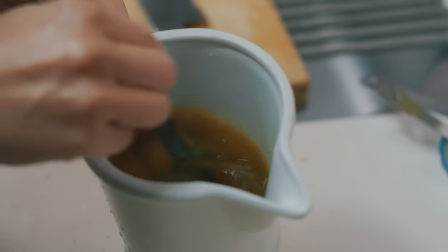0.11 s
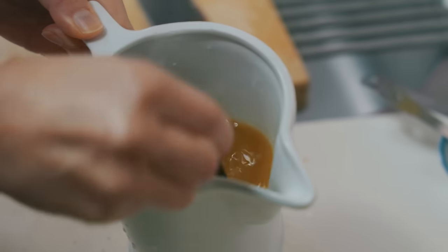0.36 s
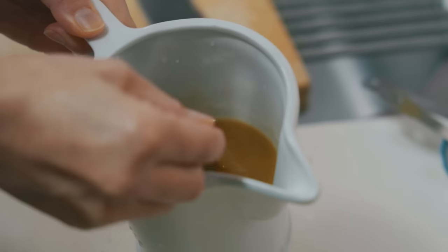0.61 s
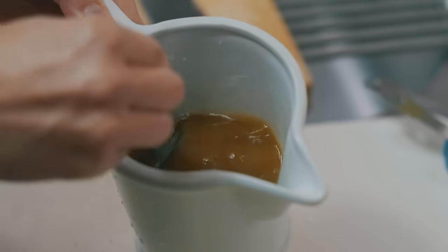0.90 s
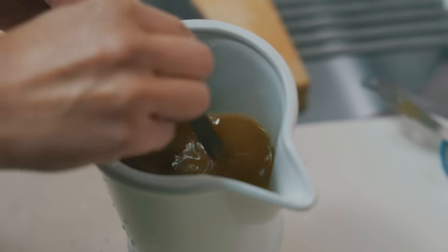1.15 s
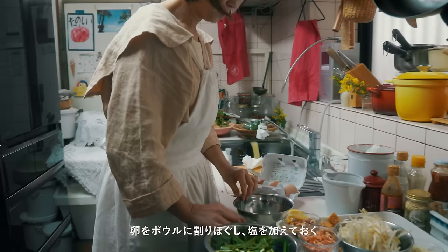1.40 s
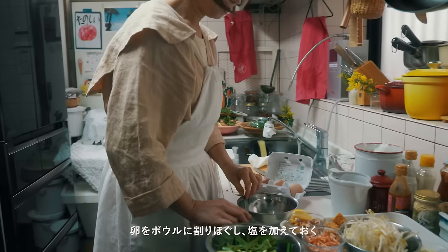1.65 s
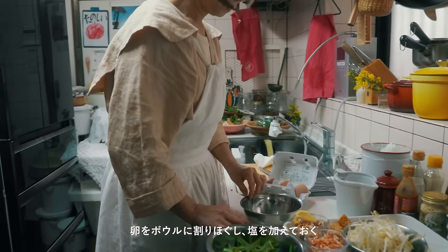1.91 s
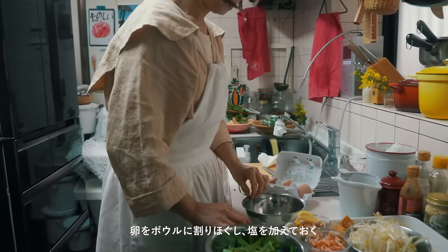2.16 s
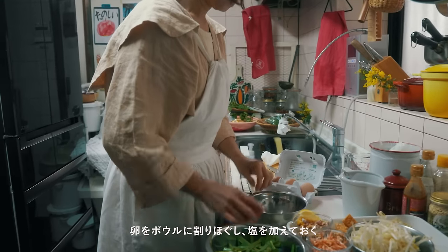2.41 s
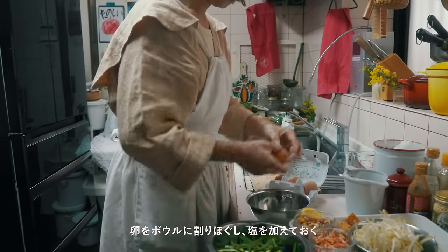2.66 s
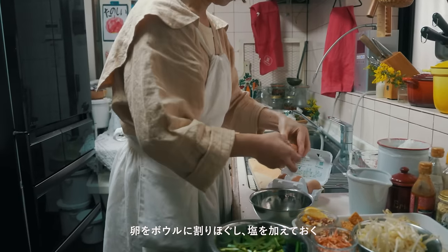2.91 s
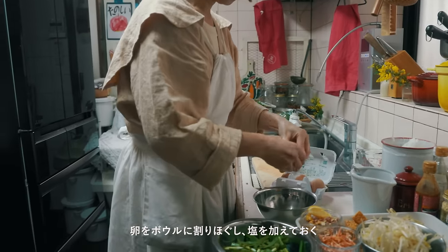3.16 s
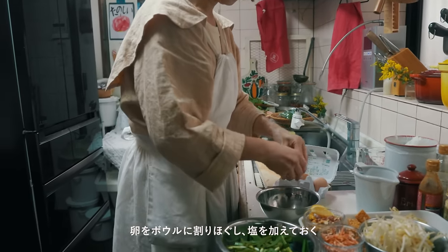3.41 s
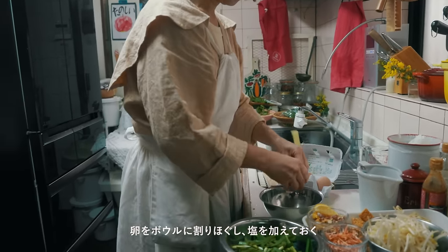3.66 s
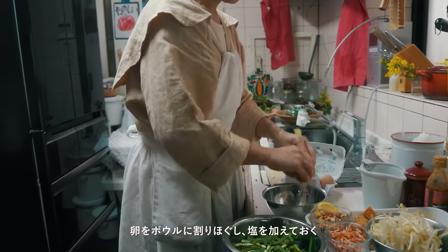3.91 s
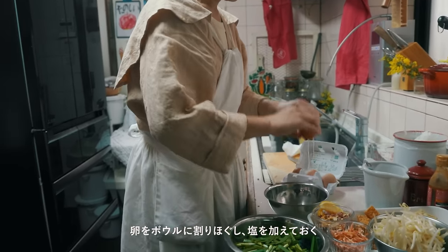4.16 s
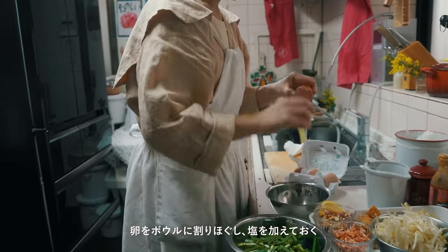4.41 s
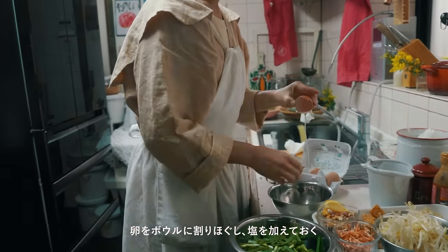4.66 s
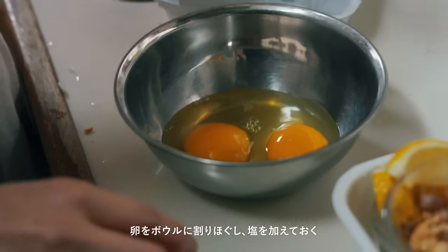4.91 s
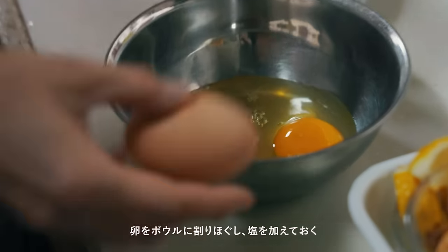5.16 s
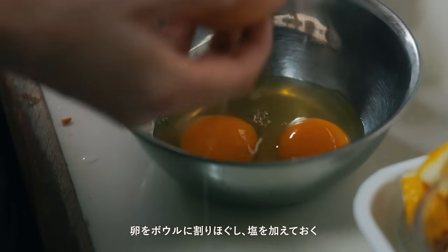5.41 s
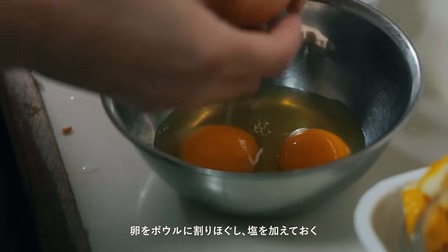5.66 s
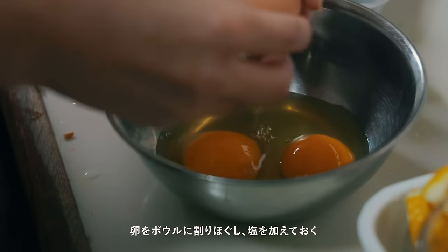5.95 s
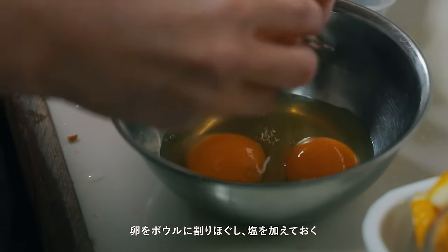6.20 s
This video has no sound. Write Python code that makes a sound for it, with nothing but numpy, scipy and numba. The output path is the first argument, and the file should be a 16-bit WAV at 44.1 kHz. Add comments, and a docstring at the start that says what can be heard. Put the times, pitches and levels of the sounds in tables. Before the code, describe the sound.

Hollow stirring and bright spoon clinks stop abruptly; hard eggshell knocks follow, then delicate crackling and a crisp close shell break.

```python
"""A spoon stirs thick sauce in a jug: stick-slip noise drives a gliding air resonance, and clinks ring wall
modes. At a hard cut this stops dead; eggs are then rapped on a kitchen counter beside a steel bowl and prised
open. Blows are short fracture noise plus damped counter modes; cracks are pitched snaps that sound the hollow
shell, among brief swells of grainy noise. Decaying noise gives the small hard kitchen's reverberation; the last
cracks get less. Shaped noise is the room tone, with a faint mains hum and, late on, a thin whine."""
import sys
import numpy as np
from scipy import signal
from scipy.fft import rfft, irfft
from scipy.io import wavfile
from numba import njit

SR = 44100
rng = np.random.default_rng(int(sys.argv[2]) if len(sys.argv) > 2 else 0)


def invert_db(x):
    """Field ratio 10**(x/20) for x, a level in decibels (scalar or array-like)."""
    u = np.asarray(x, float) / 20
    return 10 ** u


def wav_record(signal):
    """Record a signal, one row per channel, as 16-bit PCM in the file named by sys.argv[1]."""
    frames = np.transpose(np.atleast_2d(signal))
    bounded = np.clip(frames, -1, 1)
    # unit amplitude maps onto the largest positive 16-bit level
    quanta = np.round(bounded * 32767).astype(np.int16)
    wavfile.write(sys.argv[1], SR, quanta)


N = 278271
TIME, HZ = np.arange(N) / SR, np.maximum(np.fft.rfftfreq(N, 1 / SR), 1)
CUT_S, NEAR_FROM_S = 1.336, 5.5     # the stirring stops; the shell is heard close from here

# Blows on the counter. Each row: start in seconds, then relative levels in dB of crunch, knock and thud.
BLOWS = [(1.3381, -50, -38, -34), (1.4478, -22, -10.5, -18.5), (1.6311, -2.5, -10.5, -27.5),
         (1.8239, -12.5, -26.5, -31.5), (2.0145, -11.5, -27, -31.5), (2.2045, -21.5, -31, -31),
         (2.362, -26, -35, -39.5), (2.6784, -56.5, -55.5, -45.5), (2.7818, -63, -76, -52),
         (3.6498, -34, -46.5, -67), (4.7577, -54.5, -56.5, -49), (4.8038, -9.5, -32.5, -38.5),
         (5.0028, -15, -33.5, -33.5), (5.3778, -61, -75.5, -51)]
# Spectrum of the crushing shell. Each row: frequency in Hz, density in dB per Hz.
CRUNCH_SPECTRUM = [(1060, -19.5), (1800, -7.5), (3200, -16), (3670, -13.5), (6180, -11), (8750, -9),
                   (14700, -5.5), (16000, -35.5)]
# Upper modes of the counter top. Each row: frequency in Hz, relative level in dB, decay time t60 in seconds.
UPPER_COUNTER_MODES = [(462.8, 2, 0.074), (550, -5, 0.07), (610, -1.5, 0.052), (715, 0, 0.03),
                       (840, -1.5, 0.029), (945, 0.5, 0.033), (1200, 11, 0.0068), (1387, -6.5, 0.063),
                       (1610, -10.5, 0.027)]
# Low modes of the counter top. Each row: frequency in Hz, relative level in dB, decay time t60 in seconds.
LOW_COUNTER_MODES = [(140, -14, 0.24), (175.5, -4.5, 0.053), (212, -1, 0.39), (243, 1, .11),
                     (307, -6.5, 0.038), (380, -2, 0.049), (440, -7.5, .06)]
# Shell cracking open. Each row: start in seconds, relative level in dB, pitch in Hz,
# relative level of the hollow in dB, note of the hollow in Hz.
SHELL_CRACKS = [(3.157, -41.5, 2566, -49.5, 2930), (3.29, -38.5, 2510, -45, 2760),
                (3.384, -43, 5180, -45.5, 2150), (3.397, -42.5, 3650, -52, 2480),
                (3.448, -33.5, 6940, -49, 2280), (3.478, -49, 7800, -48, 1390),
                (3.573, -48, 4620, -51, 2480), (3.648, -34, 7200, -36, 2785),
                (3.658, -37.5, 10400, -41, 2560), (3.678, -35.5, 9330, -58, 2490),
                (3.728, -45.5, 10050, -63, 1080), (3.756, -60, 2530, -51, 2050),
                (3.774, -47, 5450, -51, 1870), (3.818, -60, 2510, -43.5, 1410),
                (3.88, -53.5, 2570, -48, 1890), (3.971, -48, 2870, -39, 1006),
                (4.046, -45.5, 6820, -50.5, 2510), (5.66, -36.5, 3612, -40.5, 1140),
                (5.73, -41.5, 3730, -56, 2150), (5.861, -46, 4930, -64.5, 3000),
                (5.921, -51.5, 4370, -72, 1200), (5.983, -27, 8000, -36, 1685),
                (6.027, -55.5, 3970, -48, 1140), (6.107, -37, 9600, -60, 3040),
                (6.119, -34, 8600, -60, 2610), (6.129, -40, 7550, -56.5, 1983),
                (6.226, -44.5, 8300, -35.5, 1543), (6.2398, -15, 6100, -13.5, 1572),
                (6.2511, -6.5, 3100, -11, 1686), (6.261, -27, 3210, -45, 1700),
                (6.305, -9.5, 5130, -20.5, 1140)]
# Modes of the hollow half shell. Each row: multiple of its note, relative level in dB, decay time t60 in seconds.
HOLLOW_MODES = [(0.501, -19.5, 0.1), (.9, 0.5, 0.021), (1.001, -5, 0.054), (1.15, -7.5, 0.046),
                (1.898, -8, 0.02316), (2.6, -16.5, 0.024)]
# Spans in which fingers work at the shell. Each row: start in seconds, end in seconds.
HANDLING_SPANS = [(3.14, 4.1), (5.55, 6.24)]
# Brief swells of grainy noise. Each row: time of the peak in seconds, relative level in dB, # swell in seconds,
# hold in seconds, share of the bright part in dB.
ROUGH_NOISES = [(1.455, -18, 0.011, 0.0025, -7.5), (2.448, -46, 0.018, .002, -17), (3.459, -45, .05, .002, 0),
                (3.648, -44.5, 0.026, 0.0017, -3.5), (3.796, -60, .04, 0.043, -8),
                (3.9, -56, 0.036, 0.036, -6.5), (3.972, -54, 0.0094, 0.0018, -13),
                (4.392, -46, .014, .002, -18.5), (4.428, -37.5, 0.0054, 0.0019, -25),
                (4.604, -62, 0.036, 0.034, -17), (4.686, -58, .06, .01, -11), (4.77, -55, 0.032, 0.0018, -18),
                (5.199, -61.5, .01, .14, -9), (6.143, -53, .02, 0.11, -1)]
# Spoon dragged through the jug; depth tunes the air above the sauce. Each row: time in seconds,
# slosh level in dB, air column resonance in Hz, level of the scrape on the wall in dB.
STIR_PATH = [(0.0, -52, 746, -55), (0.066, -41.5, 851, -55.5), (0.15, -32, 910, -58.5),
             (0.174, -52, 1123, -52), (0.19, -51.5, 970, -51), (0.218, -43, 853, -48.5),
             (0.33, -42.5, 969, -49), (0.374, -40, 1026, -54), (0.41, -51, 911, -52),
             (0.48, -71.5, 895, -62.5), (0.51, -49, 888, -57.5), (0.58, -48, 965, -49.5),
             (0.73, -56.5, 890, -58.5), (0.82, -57, 896, -50), (0.89, -49.5, 875, -59),
             (1.005, -45, 1123, -50.5), (1.064, -48.5, 958, -55), (1.16, -54.5, 937, -50),
             (1.24, -57.5, 951, -51), (1.336, -55, 975, -55)]
# Spectrum of the scrape. Each row: frequency in Hz, density in dB per Hz.
SCRAPE_SPECTRUM = [(760, -28.5), (1300, -1), (1880, -11.5), (2330, -5), (2920, -12), (3540, -2.5),
                   (4220, -10), (5020, -8), (15000, -34)]
# Spoon hitting the jug. Each row: start in seconds, relative level of the tick in dB,
# relative level of the air column in dB, loudest wall note in Hz.
SPOON_CLINKS = [(0.008, -28.5, -36.5, 3700), (0.0399, -26.5, -37, 2560), (0.0723, -32.5, -31.5, 2470),
                (0.1, -46.5, -28, 2340), (0.1356, -30.5, -32.5, 5800), (0.174, 0.5, -8.5, 6480),
                (0.187, -21, -9.5, 4370), (0.204, -39.5, -25.5, 2720), (0.2477, -24.5, -28.5, 2250),
                (0.2838, -33.5, -38, 2110), (0.3382, -33, -39, 2400), (0.38, -20, -22.5, 2500),
                (0.404, -32, -25.5, 3500), (0.4206, -22, -32, 2490), (0.5267, -29.5, -28, 2510),
                (0.542, -25.5, -54, 2440), (0.6251, -12.5, -22, 3750), (0.661, -27, -64, 2140),
                (0.673, -32, -62, 2750), (0.7816, -33, -23, 2110), (0.841, -41.5, -31.5, 3060),
                (0.882, -58, -20.5, 2330), (0.9075, -7, -22, 5880), (0.918, -10.5, -18.5, 5840),
                (1.041, -35, -41.5, 2390), (1.0705, -5, -11.5, 2965), (1.0922, 0, -11.5, 5120),
                (1.11, -27.5, -16.5, 2300), (1.1292, -18.5, -30, 2050), (1.146, -25.5, -51, 2540),
                (1.2074, -24.5, -56, 2780), (1.2409, -11, -19, 3950), (1.3159, -26.5, -50, 2420)]
# Modes of the jug wall. Each row: frequency in Hz, relative level in dB, decay time t60 in seconds.
JUG_MODES = [(2110, -4, 0.075), (2390, -4.5, 0.027), (2780, -11, 0.078), (3100, -6, 0.055),
             (3387, -8.5, 0.046), (3810, 0.5, 0.015), (4244, 1.5, 0.011), (4560, -4.5, 0.047),
             (5120, -5, 0.055), (5960, -5.5, 0.042), (5860, -4, 0.025), (6730, -8, 0.045)]
# Partials of the steel bowl. Each row: frequency in Hz, relative level in dB, decay time t60 in seconds.
BOWL_MODES = [(4614, -58, 2.3), (5400, -27.5, 0.07), (6440, -36, 0.05), (8150, -65.5, 1.2),
              (8950, -51, .15), (9750, -71, 1.0), (11600, -56.5, .15), (14050, -55, .15)]
# Jolts that shake the bowl, one already before the cut. Each row: start in seconds, relative level in dB.
BOWL_SHAKES = [(1.2, -9.5), (1.452, 0), (1.634, -1)]
# A hand or arm leans on the counter and it flexes. Each row: start in seconds, relative level in dB, frequency in Hz.
COUNTER_BUMPS = [(2.69, -46, 135), (2.714, -54, 62.1), (2.789, -51.5, 135), (2.84, -58, 96.2),
                 (4.761, -39.5, 121), (4.804, -46, 132.7), (4.867, -52.5, 88.4), (5.005, -40, 135.3),
                 (5.063, -42.5, 136.4)]
# Reverberation of the kitchen. Each row: frequency in Hz, decay time t60 in seconds.
KITCHEN_DECAY = [(100, 0.45), (260, .3), (700, .22), (1840, 0.21), (4850, .19), (9000, 0.15), (15000, 0.06)]
# Spectrum of the room tone. Each row: frequency in Hz, density in dB per Hz.
ROOM_SPECTRUM = [(15, -46), (25, -34), (102, -9), (287, -3.5), (320, -11.5), (376, -7), (630, -13.5),
                 (1030, -15.5), (1210, -19.5), (1500, -18.5), (1860, -25.5), (13100, -33.5), (16300, -35.5)]
# Mains hum. Each row: time in seconds, rms level in dB before it wavers.
HUM_LEVEL = [(0, -71), (1.33, -71), (1.4, -73), (4.2, -80), (4.7, -90.5), (5.2, -76), (6.31, -72.5)]


def rms_one(x):
    """Normalise the mean power to one."""
    return x / np.sqrt(np.mean(x ** 2) + 1e-20)


def in_time(rows):
    """Linear interpolation turns the columns of a curve into sample-by-sample controls."""
    s, *columns = np.transpose(rows)
    return [np.interp(TIME, s, column) for column in columns]


def at_hz(points, hz):
    """Interpolation on a logarithmic frequency axis."""
    point_hz, values = np.transpose(points)
    return np.interp(np.log(hz), np.log(point_hz), values)


def coloured(x, spectrum):
    """Linear filtering: each spectral component is multiplied by the given gain."""
    return irfft(rfft(x) * invert_db(at_hz(spectrum, HZ)), N)


def band(x, low_hz, high_hz):
    """Causal Butterworth band-pass filtering."""
    edges = [low_hz, min(high_hz, .45 * SR)]
    return signal.sosfilt(signal.butter(2, edges, "band", fs=SR, output="sos"), x)


def ring(clicks, hz, t60):
    """Impulse response of a damped oscillator: a unit click starts a decaying sine of height 1."""
    radius, angle = invert_db(-60 / (t60 * SR)), 2 * np.pi * hz / SR
    poles = [1, -2 * radius * np.cos(angle), radius * radius]
    return signal.lfilter([0, np.sin(angle)], poles, clicks + 1e-18)


def strike(times, dbs, modes, spread_db):
    """Modal superposition: every blow excites every mode with a strength and sign of its own."""
    at, out = np.round(np.array(times) * SR).astype(int), np.zeros(N)
    luck = rng.standard_normal((len(at), len(modes), 2))
    for k, (hz, level_db, t60) in enumerate(modes):
        strength_db = np.array(dbs) + level_db + spread_db * luck[:, k, 0]
        clicks = np.zeros(N)
        clicks[at] = invert_db(strength_db) * np.sign(luck[:, k, 1])
        out += ring(clicks, hz, t60)
    return out


def grit(sparse_db):
    """Intermittent fracture and slip: noise with a long-tailed spread of sizes; rms 1."""
    sizes = invert_db(sparse_db * np.minimum(rng.exponential(1, N), 5))
    return rms_one(sizes * rng.standard_normal(N))


def bursts(times, dbs, lengths_ms):
    """Contact envelope: a 0.67 ms rise, then exponential decay from 0.6 of the given length on."""
    out = np.zeros(N)
    for s, db, ms in zip(times, dbs, lengths_ms):
        i, length_s = round(s * SR), max(ms, .3) / 1000
        t = TIME[:min(N - i, SR // 10)]
        decay = np.exp(-np.maximum(t / length_s - .6, 0) * 1.3)
        out[i:i + len(t)] += invert_db(db) * np.minimum(t / 0.00067, 1) * decay
    return out


@njit
def gliding(x, hz, r, sr):
    """Second-order resonance with a moving centre; r is the pole radius, the peak gain 1."""
    y = np.zeros(len(x))
    for i in range(2, len(x)):
        drive = (1 - r * r) / 2 * (x[i] - x[i - 2])
        y[i] = drive + 2 * r * np.cos(2 * np.pi * hz[i] / sr) * y[i - 1] - r * r * y[i - 2]
    return y


def flutter(rate, depth_db):
    """Random amplitude modulation: the gain heads for a new value rate times a second."""
    knots = rng.standard_normal(700)
    return invert_db(depth_db * np.interp(TIME * rate, np.arange(700), knots))


def smacks(per_s, low_hz, high_hz):
    """Adhesive release: small wet grains, each a resonance that dies by 60 dB in 64 cycles; rms 1."""
    born = grit(4.6) * (rng.random(N) < per_s / SR)
    pitches, dealt = np.geomspace(low_hz, high_hz, 14), rng.integers(0, 14, N)
    return rms_one(sum(ring(born * (dealt == k), hz, 64.0 / hz) for k, hz in enumerate(pitches)))


def knocks():
    """Impact: the shell crunches, the counter knocks and thuds; also returns the crunch as sent to the walls."""
    s, crunch_db, knock_db, thud_db = np.transpose(BLOWS)
    ms = 0 * s + 4.42       # crunch length
    # the part above 8 kHz gives way as the knock rises over -44 dB
    edge_db = crunch_db - 13.5 - 0.68 * np.maximum(knock_db + 44, 0)
    fractures = rms_one(coloured(grit(2.5), CRUNCH_SPECTRUM))
    body, edge = rms_one(band(fractures, 1200, 8000)), rms_one(band(grit(3.0), 8000, 16500))
    crunch = body * bursts(s, crunch_db - 10.5, ms) + edge * bursts(s, edge_db - 2.5, ms)

    # from afar each crunch is one snap
    snaps = np.zeros((2, N))
    snaps[:, np.round(s * SR).astype(int) + 60] = invert_db([crunch_db + 28.5, edge_db + 14]) * np.sqrt(ms / 5)
    snap = band(coloured(snaps[0], CRUNCH_SPECTRUM), 1200, 8000) + band(snaps[1], 8000, 17000)

    # the crushing shell pushes unevenly for some ms, and each blow lands elsewhere
    push = grit(2.5) * bursts(s, knock_db - 28, 1.17 * ms)
    spot = rng.standard_normal((len(s), len(UPPER_COUNTER_MODES)))[np.searchsorted(s, TIME) - 1]
    knock = invert_db(30) * band(push, 340, 2100)
    for k, (hz, db, t60) in enumerate(UPPER_COUNTER_MODES):
        knock += ring(push * invert_db(db + 3.0 * spot[:, k]), hz, t60)

    thud = strike(s + 0.0019, thud_db - 3, LOW_COUNTER_MODES, 3)
    thud += rms_one(band(grit(0.95), 150, 600)) * bursts(s, thud_db - 8, 0 * s + 14.0)
    counter = band(knock, 330, 5000) + band(band(thud, 98, 900), 130, 550)
    return crunch, snap, counter


def cracks():
    """Brittle fracture: each is a short broad snap with its own pitch that also sounds the hollow shell."""
    noise = grit(2.5)
    hollow, out = np.zeros(N), np.zeros(N)
    for s, snap_db, hz, hollow_db, note_hz in SHELL_CRACKS:
        i = round(s * SR)
        ms = 2.0 + 0.0053 * (snap_db + 41.5)        # bigger fractures run slightly longer
        envelope = bursts([0], [snap_db - 4.5], [ms])
        piece = noise[i:i + SR // 10] * envelope[:min(SR // 10, N - i)]
        out[i:i + len(piece)] += .9 * band(piece, 1250, 11000) + .9 * band(piece, hz / 1.1, hz * 1.1)
        modes = [(k * note_hz, db, t60) for k, db, t60 in HOLLOW_MODES]
        hollow += strike([s + .0005], [hollow_db - 8], modes, 0.75)
    return out + band(hollow, 680, 8600)


def crackle():
    """Random micro-fracture: faint ticks of shell under the fingers, each in one of four bands."""
    handled = sum((TIME > a) & (TIME < b) for a, b in HANDLING_SPANS)
    born = grit(1.0) * (rng.random(N) < 60 / SR) * handled      # 60 ticks a second on average
    dealt = rng.integers(0, 4, N)
    ticks = sum(band(born * (dealt == k), hz, 1.73 * hz) for k, hz in enumerate([1500, 2530, 4360, 7100]))
    return invert_db(-81) * rms_one(ticks)


def rough_noise():
    """Grainy noise, bright and dull; each burst swells, holds and fades."""
    swell_rise_db, fade_db_per_s = 22, 430
    slips, out = grit(6.1) * flutter(72, 1.0), np.zeros(N)
    dull = rms_one(rms_one(band(slips, 600, 3800)) + 0.3 * smacks(250, 740, 2600))
    bright = rms_one(band(slips, 3600, 9500))
    for s, db, swell_s, hold_s, bright_db in ROUGH_NOISES:
        share = invert_db(min(bright_db, 0))
        before_db = swell_rise_db * np.maximum(s - TIME, 0) / max(swell_s, .001)
        after_db = fade_db_per_s * np.maximum(TIME - s - hold_s, 0)
        envelope = invert_db(db - 8.5 - np.minimum(before_db + after_db, 200))
        out += envelope * (dull * np.sqrt(1 - share ** 2) + bright * share)
    return out


def stirring():
    """Stick-slip excitation: the spoon sounds the air above the sauce and the wall; clinks do so harder."""
    column_db, column_hz, scrape_db = in_time(STIR_PATH)
    swing_db = column_db - column_db[TIME < CUT_S].mean()
    slips = grit(2.5)
    narrow = np.exp(-np.pi * 60 / SR)       # pole radius of a 60 Hz bandwidth; powers widen it
    column = gliding(slips * flutter(65, 1.7), column_hz, narrow, SR)
    column = gliding(column, column_hz, narrow ** 3, SR)
    # next mode of the air, moving less in proportion
    overtone = gliding(slips * flutter(50, 4.6), 1500 + 1.05 * column_hz, narrow ** 1.8, SR)
    overtone_db = scrape_db - 5.5 + .1 * swing_db       # follows a tenth of the slosh's swing
    scrape = rms_one(coloured(slips * flutter(40, 6), SCRAPE_SPECTRUM)) + 0.48 * smacks(460, 1600, 6500)
    drag = invert_db(scrape_db) * scrape + invert_db(overtone_db) * rms_one(overtone)

    s, tick_db, boom_db, note_hz = np.transpose(SPOON_CLINKS)
    boom_hz = column_hz[(s * SR).astype(int)]
    note_db = tick_db - 5.5 - 3.5 * np.log2(note_hz / 2400)     # higher notes stand out less
    contact = bursts(s, tick_db - 17.0, 0 * s + 4.9) + bursts(s, tick_db - 32.5, 0 * s + 12.0)
    tick = band(grit(0.51), 930, 7300) * contact
    wall = strike(s, tick_db - 24, JUG_MODES, 4.0)
    boom, note = np.zeros(N), np.zeros(N)
    for a, hz, db in zip(s, boom_hz, boom_db):
        boom += strike([a], [db + 0.12], [(hz, 0, .07), (1.4 * hz, -10, .03)], 0.27)
    for a, hz, db in zip(s, note_hz, note_db):
        note += strike([a], [db], [(hz, 0, 60 / hz)], 0.29)
    out = invert_db(column_db) * rms_one(column) + drag + tick + wall + band(boom, 854, 1400) + note
    return band(band(out, 540, 19000), 650, 17000)      # a small jug radiates no bass


def bowl():
    """Light damping: thin steel partials outlast the blows; heard only after the cut."""
    return strike(*np.transpose(BOWL_SHAKES), BOWL_MODES, .5) * (TIME >= CUT_S)


def bumps():
    """Flexural motion: soft, damped low swings of the counter top."""
    swings = sum(strike([s], [db + .1], [(hz, 0, .12)], 0.46) for s, db, hz in COUNTER_BUMPS)
    return band(band(swings, 45, 177), 45, 300)


def swish():
    """Friction noise of cloth: a brief whisper, all treble, as the arm comes down."""
    start_s, length_s = 1.385, .065
    fade = np.clip(np.minimum(TIME - start_s, start_s + length_s - TIME) / .012, 0, 1)
    return invert_db(-66) * fade * rms_one(band(grit(1.5), 9200, 13500))


def kitchen(x):
    """Diffuse reverberation: noise decaying band by band, setting in after 3 ms, is convolved with x."""
    t, tail = TIME[:SR // 2], 0
    white = rng.standard_normal((2, len(t)))
    for k, low_hz in enumerate(70 * 2 ** np.arange(0, 8, .5)):      # half-octave bands
        t60 = at_hz(KITCHEN_DECAY, low_hz * 2 ** .25)
        tail = tail + band(white[k % 2], low_hz, low_hz * 2 ** .5) * invert_db(-60 * t / t60)
    tail = tail * np.clip((t - .003) / 0.0021, 0, 1)
    return signal.fftconvolve(x, tail / np.sqrt(np.sum(tail ** 2)))[:N]


def room_tone():
    """Stationary background: dull shaped noise, a wavering 100.5 Hz hum and, from 5 s, a thin pure whine."""
    air = invert_db(-61) * rms_one(coloured(rng.standard_normal(N), ROOM_SPECTRUM))
    hum = invert_db(in_time(HUM_LEVEL)[0]) * np.sqrt(2) * np.sin(2 * np.pi * 100.5 * TIME) * flutter(1.3, 1.5)
    whine = invert_db(-87) * np.sqrt(2) * np.sin(2 * np.pi * 6896 * TIME) * (TIME > 5.0)
    return air + hum + whine


def scene():
    """Superposition of direct and reverberant sound: the jug stops at the cut; the last cracks get less room."""
    jug = stirring()
    crunch, snap, counter = knocks()
    shell = cracks() + crackle() + rough_noise()
    counter = counter + bumps()
    jug = (jug + invert_db(-13.0) * kitchen(jug)) * (TIME < CUT_S)
    sent = counter + snap + shell * invert_db(np.where(TIME < NEAR_FROM_S, 1.5, -5.0))
    eggs = crunch + counter + shell + invert_db(-7.5) * kitchen(sent)
    return (jug + eggs + bowl() + swish() + room_tone())[None]


def roll_off(x):
    """The treble ends steeply here."""
    return signal.sosfilt(signal.butter(12, 16460, fs=SR, output="sos"), x)


def record(dry):
    """Band limitation and overload: the deepest bass and the top are cut, and peaks clip at full scale."""
    limited = band(dry, 25, 19500)
    low_pass = signal.cheby2(10, 50, 16900, fs=SR, output="sos")
    mix = np.clip(signal.sosfilt(low_pass, limited), -1, 1)
    return roll_off(mix)


dry = scene()
out = record(dry)
wav_record(out)
```